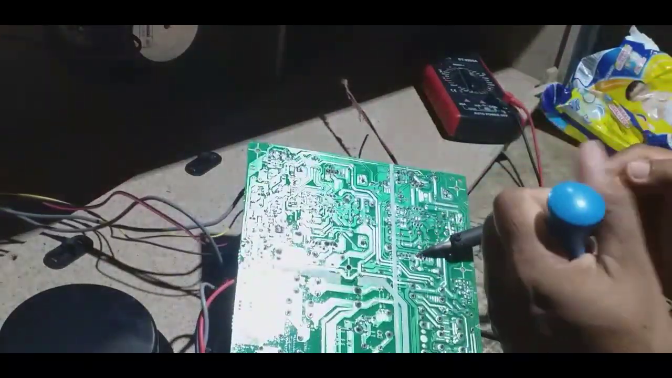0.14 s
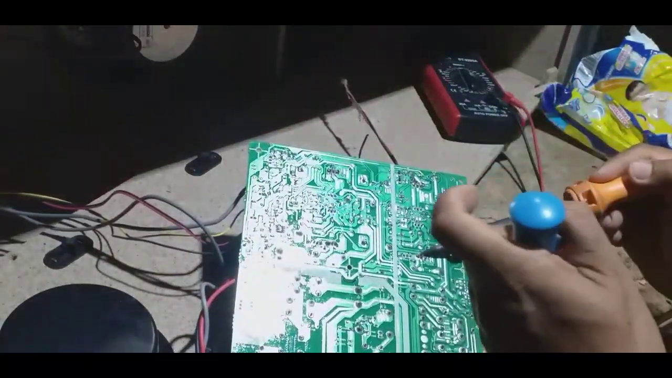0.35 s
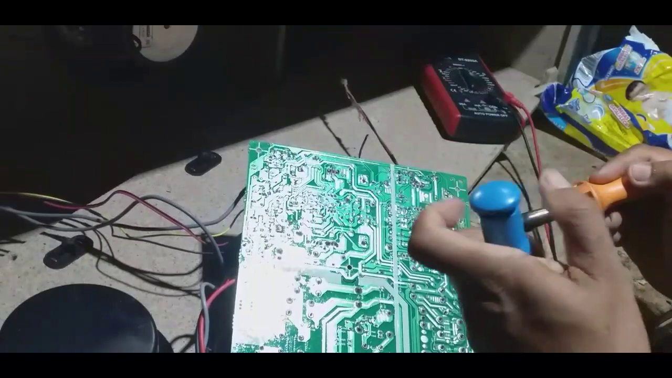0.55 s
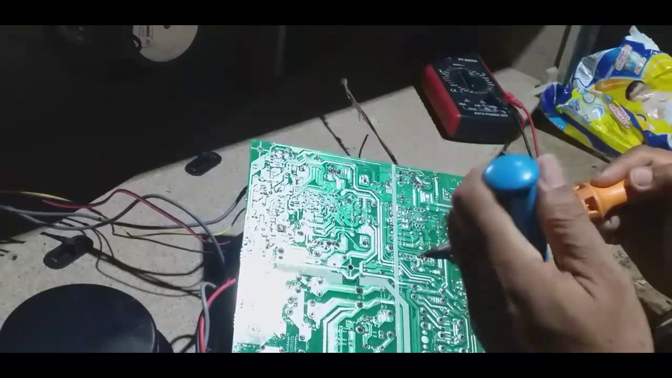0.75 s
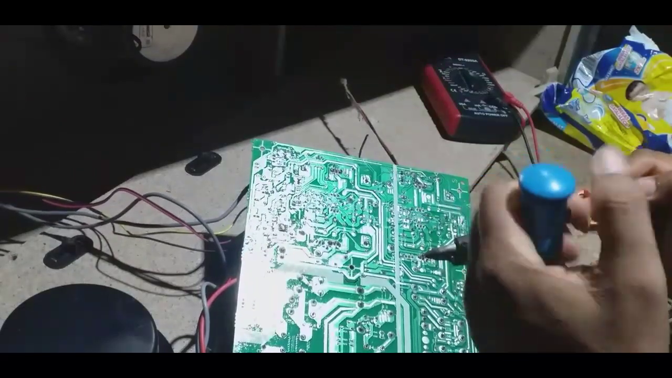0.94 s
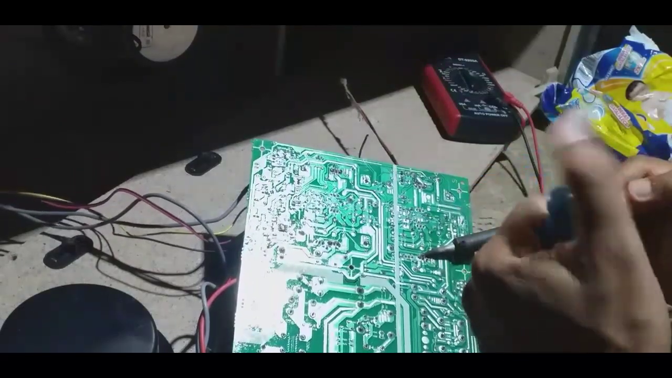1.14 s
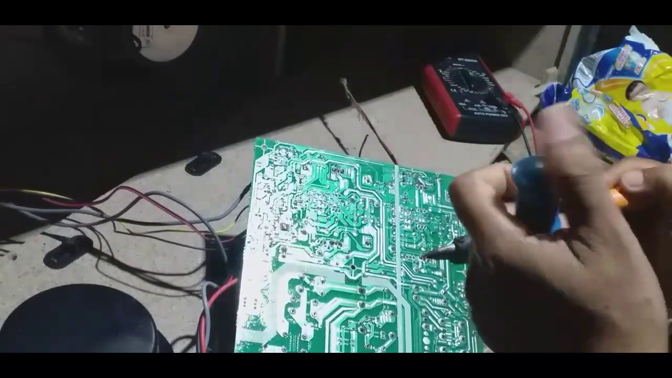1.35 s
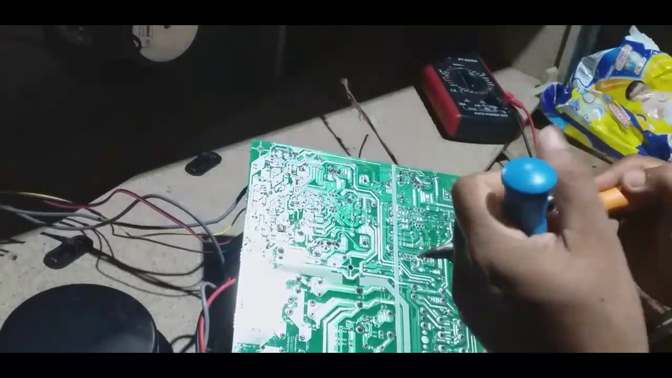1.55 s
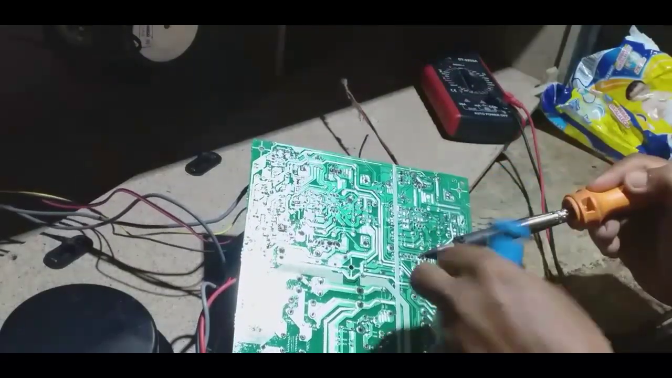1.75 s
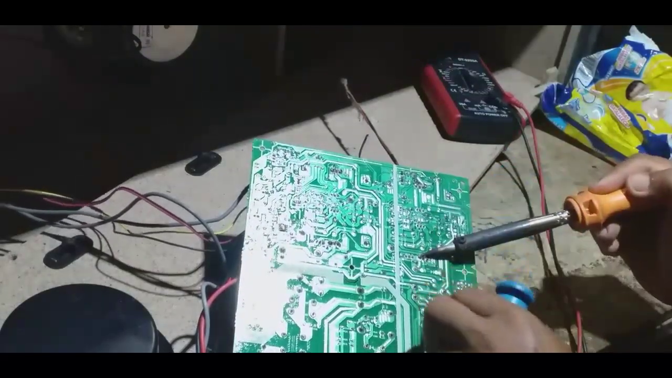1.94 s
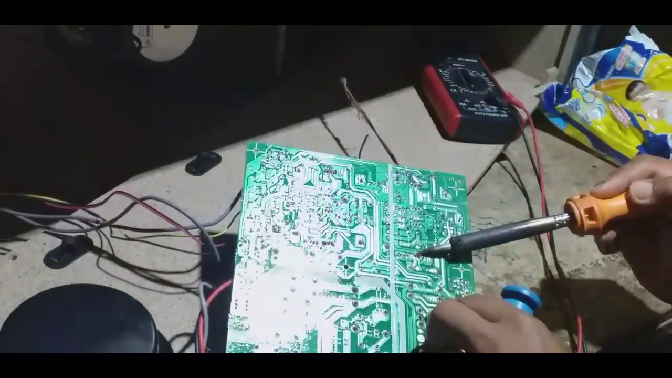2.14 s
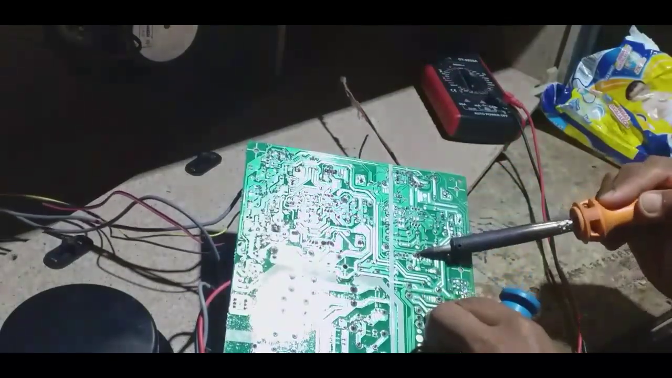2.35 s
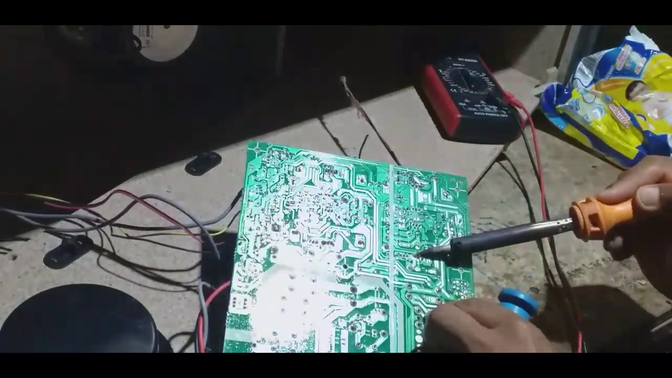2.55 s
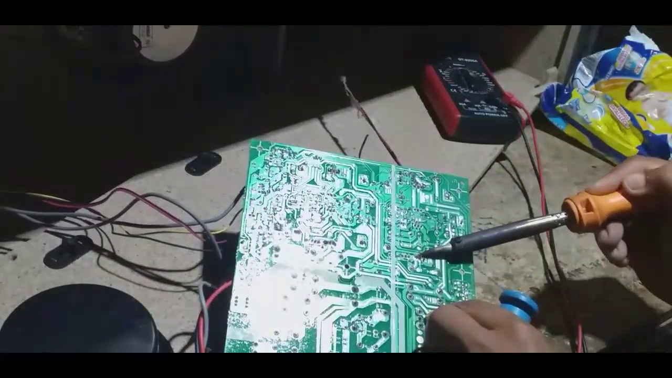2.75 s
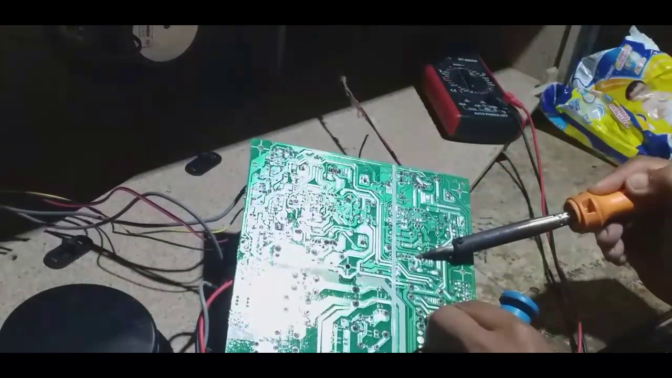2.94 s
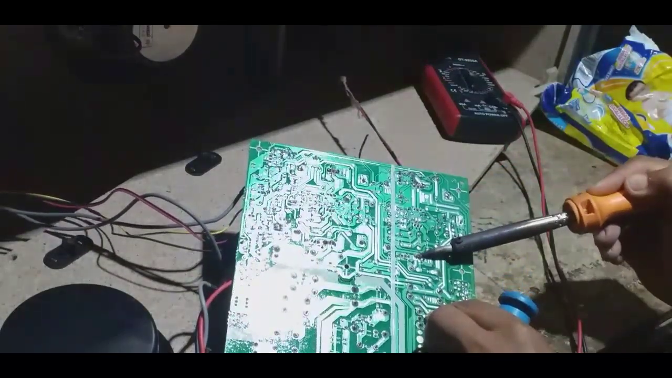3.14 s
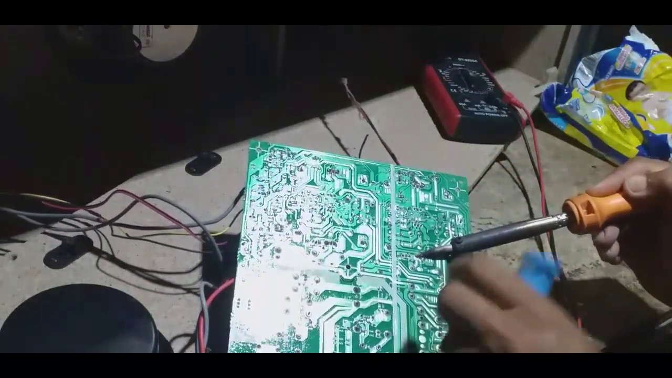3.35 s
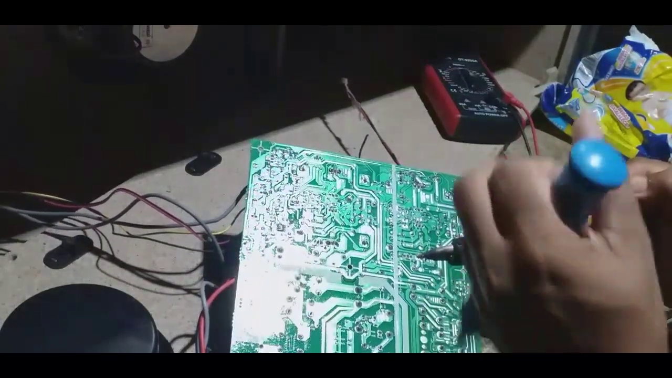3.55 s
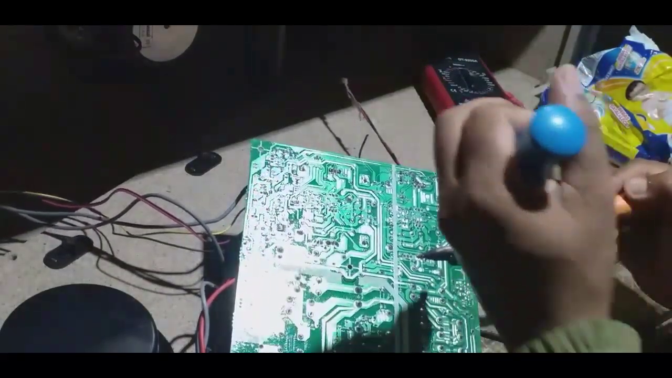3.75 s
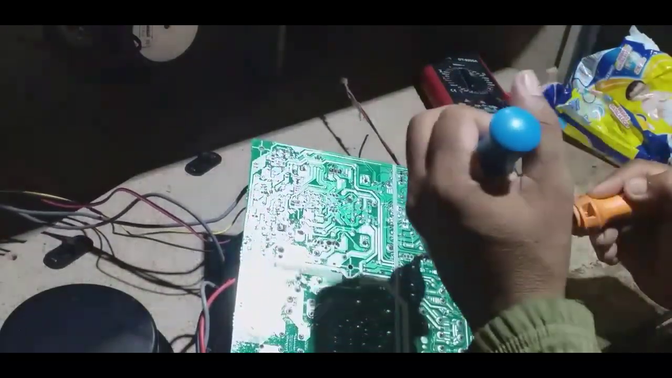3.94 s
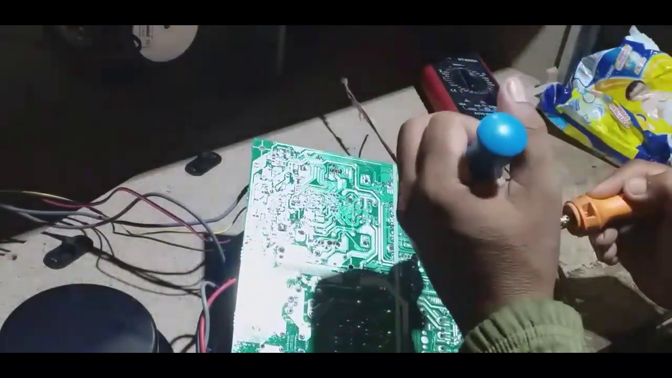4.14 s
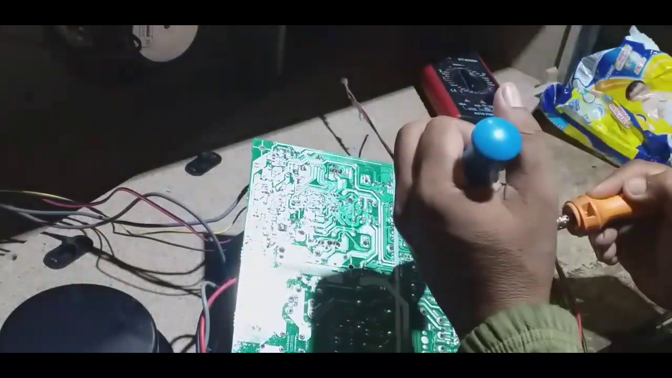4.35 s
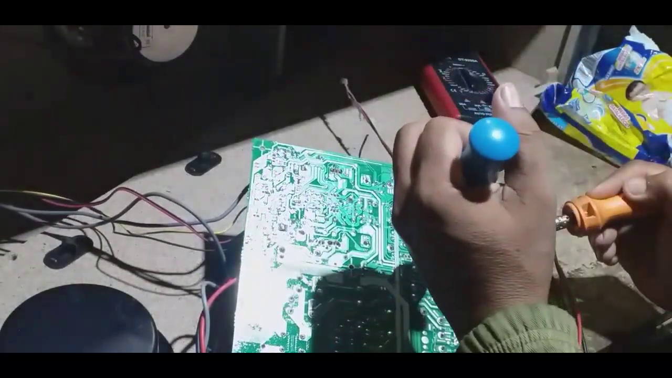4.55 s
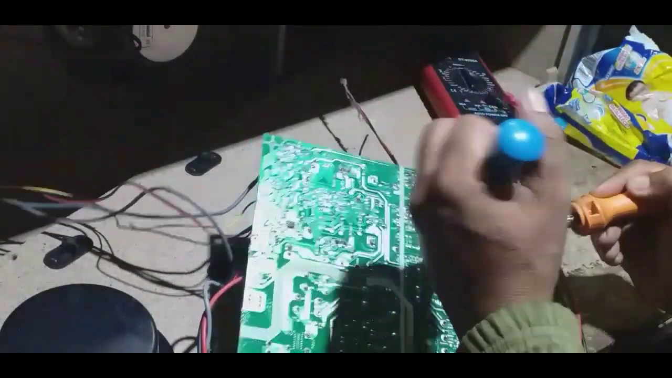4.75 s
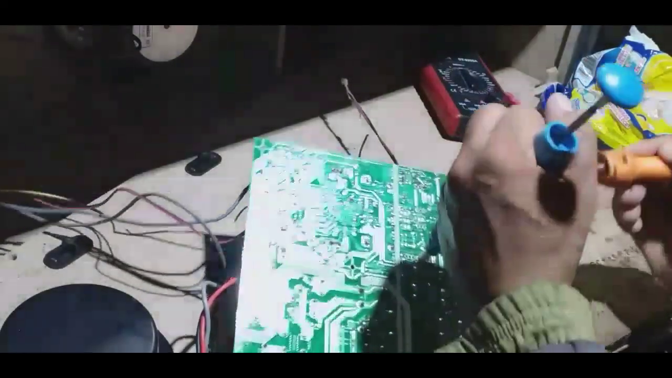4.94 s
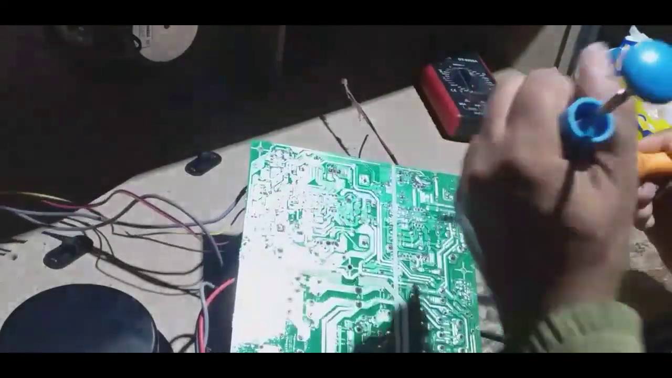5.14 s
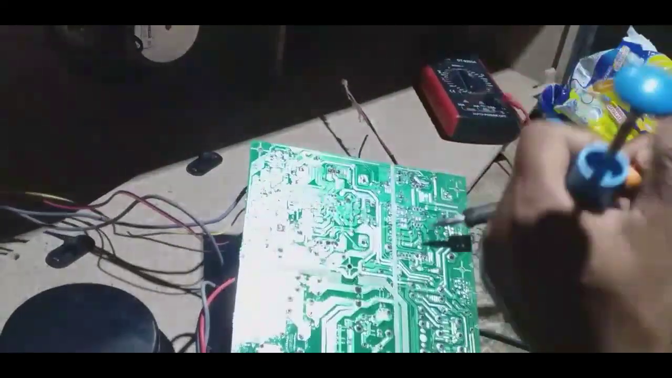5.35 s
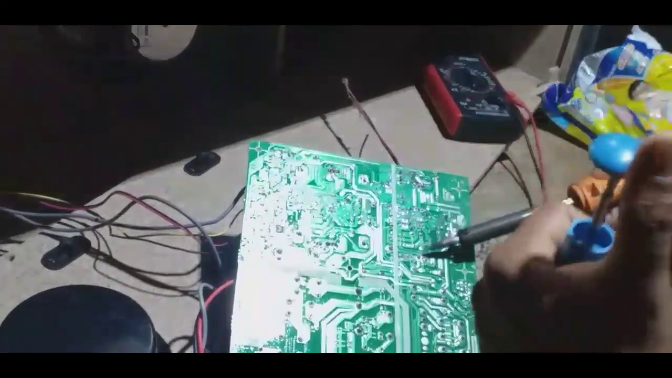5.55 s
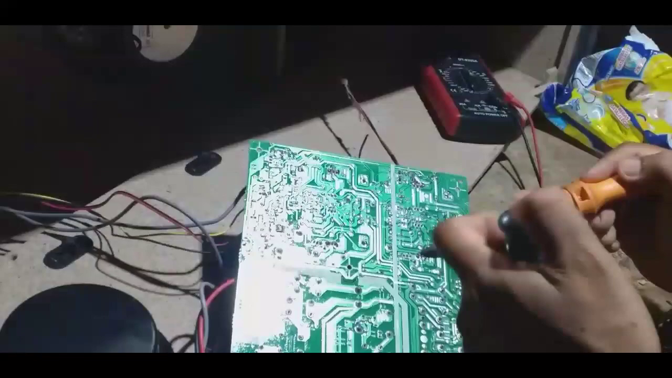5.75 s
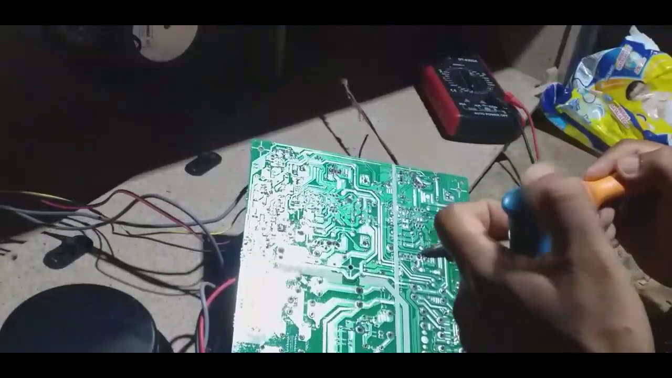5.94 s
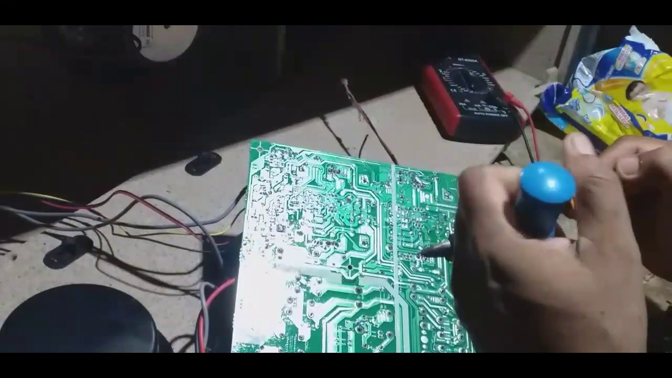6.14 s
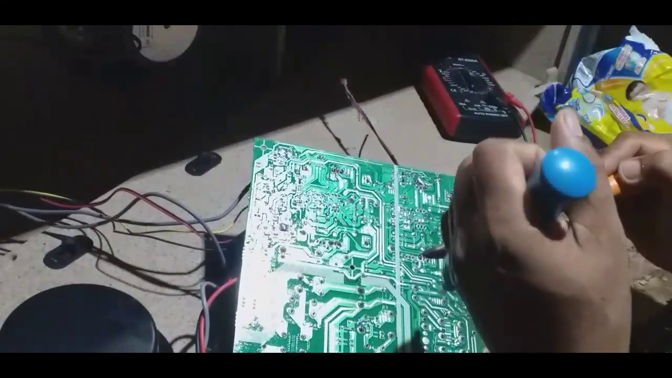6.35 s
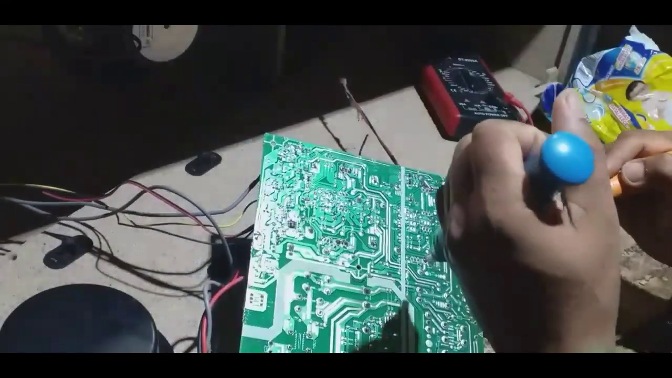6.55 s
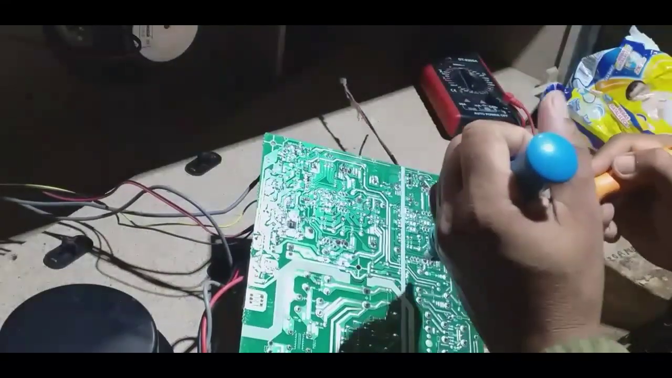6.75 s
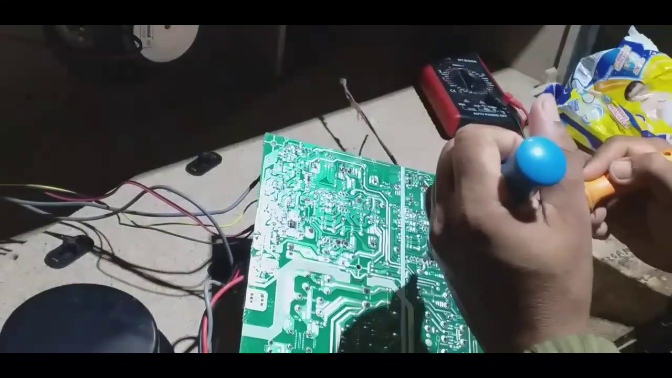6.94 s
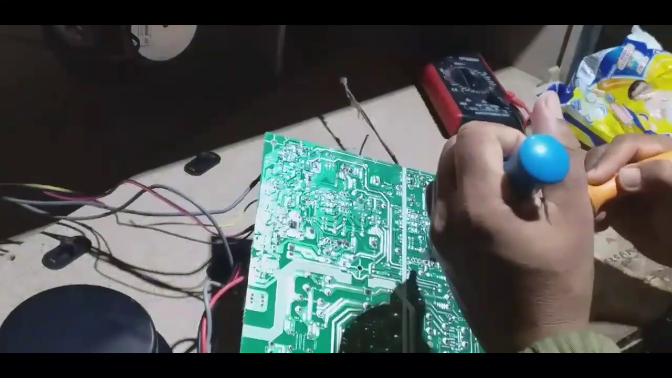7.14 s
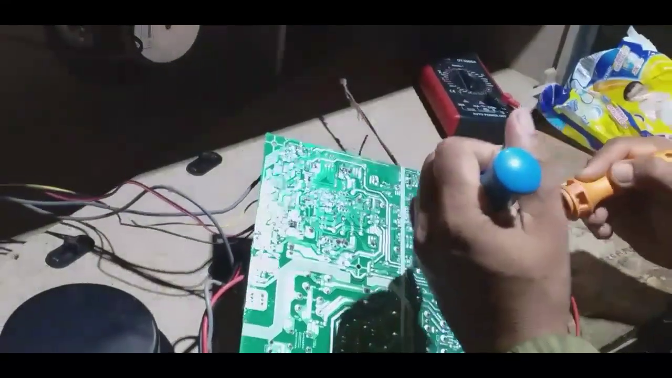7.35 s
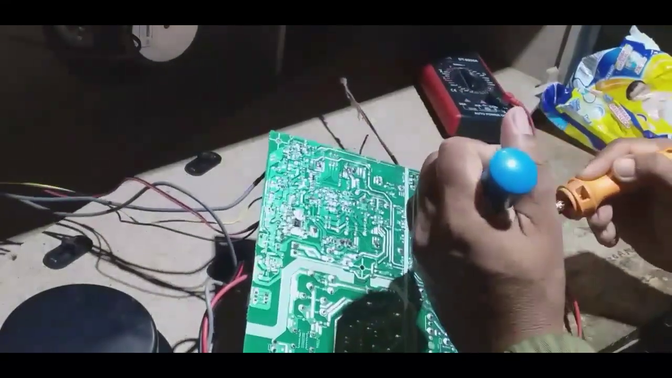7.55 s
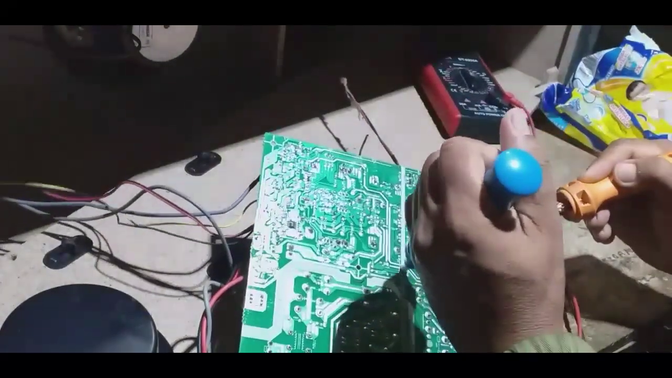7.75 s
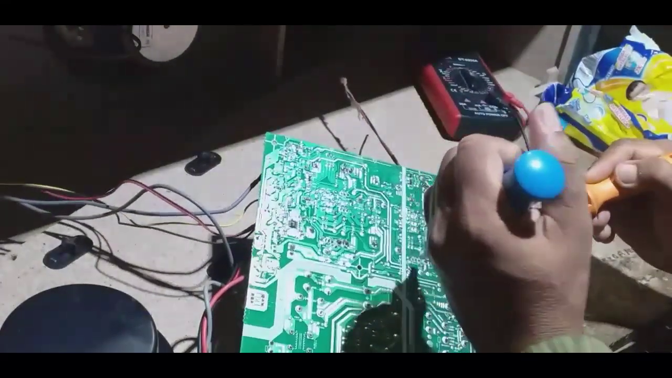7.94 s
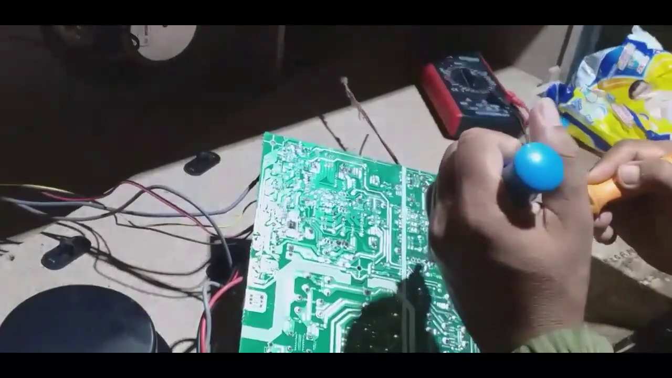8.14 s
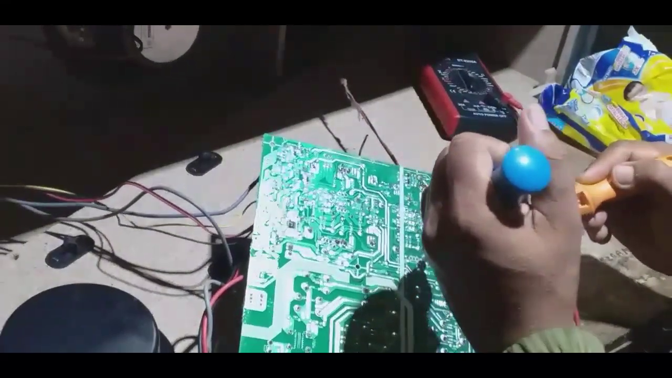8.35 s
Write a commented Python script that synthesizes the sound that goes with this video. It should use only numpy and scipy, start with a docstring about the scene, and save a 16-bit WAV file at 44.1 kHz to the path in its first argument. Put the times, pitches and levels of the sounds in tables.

```python
"""At a hard-walled workbench at night, a spring-loaded plastic desoldering pump is handled, cocked twice and fired once.
Latch clicks are noise bursts ringing the barrel, the piston rasps as gritty noise, knocks ring modes of board and bench.
Seal and spring give short narrow notes, and a diffuse tail follows every near sound. Outside, banded noise makes insect
choruses; rumble, a low hum and a distant engine that drones for a while lie below. A phone's gain sinks after loud treble."""
import sys
import numpy as np
from scipy import signal
from scipy.fft import rfft, irfft
from scipy.io import wavfile
from scipy.ndimage import uniform_filter1d

SR = 44100
rng = np.random.default_rng(int(sys.argv[2]) if len(sys.argv) > 2 else 0)


def wrap_up_sound(samples):
    """Save the sound to the file named by the first command line argument, as 16-bit audio."""
    columns = np.atleast_2d(samples).T
    # keep every value between -1 and 1, then stretch to whole-number steps
    tamed = np.clip(columns, -1, 1)
    steps = np.round(tamed * 32767).astype(np.int16)
    wavfile.write(sys.argv[1], SR, steps)


N = 369558
T = np.arange(N) / SR


def undb(db):
    """Decibels to amplitude."""
    return 10 ** (np.asarray(db) / 20)


def unit(x):
    """Scale to rms 1."""
    return x / np.sqrt(np.mean(x ** 2))


def fade_60db(t, t60_s):
    """Exponential decay that falls 60 dB in t60_s."""
    return np.exp(-np.log(1000) * t / t60_s)


def read(table):
    """Columns of a curve table, interpolated at every sample."""
    s, *columns = np.transpose(table)
    return [np.interp(T, s, column) for column in columns]


def band(x, lo_hz, hi_hz, order=2):
    """Butterworth band-pass."""
    return signal.sosfilt(signal.butter(order, [lo_hz, hi_hz], "bandpass", fs=SR, output="sos"), x)


def noise(lo_hz, hi_hz, order=2):
    """Band of noise, rms 1."""
    return unit(band(rng.standard_normal(N), lo_hz, hi_hz, order=order))


def coloured(points, size):
    """Noise with a spectrum of (Hz, dB) points joined over log frequency, rms 1."""
    hz, db = np.transpose(points)
    f = np.maximum(np.fft.rfftfreq(size, 1 / SR), 1)
    spectrum_db = np.interp(np.log(f), np.log(hz), db, -80, db[-1])
    return unit(irfft(rfft(rng.standard_normal(size)) * undb(spectrum_db), size))


def walk(rate):
    """Random levels held 1 / rate s and slewed twice; spread near 1."""
    k = int(SR / rate)
    steps = np.repeat(rng.standard_normal(N // k + 1), k)
    return 1.32 * uniform_filter1d(uniform_filter1d(steps, k), k)[:N]


def narrow(hz, width_hz):
    """Noise in a narrow band around a fixed or moving centre, rms 1: a crowd of near-equal tones."""
    pole = np.exp(-np.pi * width_hz / SR)
    z = rng.standard_normal(N) + 1j * rng.standard_normal(N)
    z = signal.lfilter([1], [1, -2 * pole, pole ** 2], z)
    return unit((z * np.exp(2j * np.pi * np.cumsum(hz + 0 * T) / SR)).real)


def arch(start, length):
    """A smooth rise and fall over one phrase."""
    return np.sin(np.pi * np.clip((T - start) / length, 0, 1))


def glide(table):
    """Pitch through a table of phrases: first to last Hz over the middle half of each."""
    rows = np.array(table)
    start, length = rows[:, 0], rows[:, 1]
    times = np.maximum.accumulate(np.c_[start + length / 4, start + length * 3 / 4].ravel())
    return np.interp(T, times, rows[:, 2:4].ravel())


def add(out, x, s):
    """Mix x into out from time s."""
    i = int(s * SR)
    out[i:i + len(x)] += x[:N - i]


def microphone_hiss():
    """Steady microphone noise, its spectrum heaviest in the top octave."""
    # hiss spectrum: pitch_hz, relative_level_db
    hiss_curve = [(5000, -51.5), (8500, -24.5), (9380, 0.5), (14900, 6.5), (15800, -5)]
    return undb(-80.5) * coloured(hiss_curve, N)


def drone():
    """The engine's steady line: a wavering sine slides up to pitch, holds and stops."""
    start_s, rise_s, stop_s, fall_s = 3.0, .17, 5.74, 0.23
    start_hz, held_hz, level_db = 90, 99.5, -47
    up = np.clip((T - start_s) / rise_s, 0, 1)
    hz = start_hz + (held_hz - start_hz) * up + 0.42 * walk(4)
    db = level_db + 1.5 * walk(12)
    gate = up ** 2 * np.clip(1 - (T - stop_s) / fall_s, 0, 1) ** 2
    return gate * undb(db) * np.sqrt(2) * np.sin(2 * np.pi * np.cumsum(hz) / SR)


def traffic():
    """Noise rumble in three swaying bands over a steady low band, an engine's two lines and a low hum."""
    # distant traffic: time_s, rumble_db, upper_rumble_db, roar_db
    traffic_curve = [(0, -61.5, -66, -68), (.45, -66, -72, -70), (.7, -65.5, -77.5, -77),
                     (1.55, -67.5, -71.5, -77), (2.03, -61, -76, -75.5), (2.66, -66.5, -83, -79),
                     (2.85, -55.5, -68, -81), (3.0, -53.5, -55.5, -81), (3.4, -56, -62, -72),
                     (3.751, -55, -67, -79), (4.301, -55.5, -65.5, -70), (4.85, -58.5, -60, -69),
                     (5.201, -59, -64, -66), (5.5, -58, -68.5, -76), (6.05, -64.5, -70, -75),
                     (6.498, -61.5, -78.5, -77), (6.78, -58.5, -67.5, -75), (7.2, -57.5, -73.5, -79.5),
                     (7.7, -58.5, -64.5, -77), (8.38, -53.5, -63, -89)]
    # the engine's rougher upper line: time_s, level_db
    upper_curve = [(0, -63), (.62, -65), (.78, -56), (1.05, -68), (1.25, -57.5), (1.65, -66.5),
                   (2.7, -64.5), (3.08, -42.5), (3.3, -58.5), (4.1, -53), (5.25, -49.5), (6.2, -65.5),
                   (6.9, -65), (7.5, -52), (7.8, -62.5), (8.38, -57)]
    # low hum: time_s, level_db
    hum_curve = [(0, -62), (2.0, -57), (2.4, -68.5), (3.3, -59), (4.1, -65), (4.85, -54), (5.6, -68.5),
                 (7.2, -61.5), (7.65, -70.5), (8.38, -56.5)]
    out = undb(-64.5) * noise(48, 130, order=4)
    for db, (lo, hi) in zip(read(traffic_curve), [(105, 237.3), (240, 450), (600, 6200)]):
        out = out + undb(db + 2.2 * walk(10)) * noise(lo, hi)
    upper = undb(read(upper_curve)[0]) * narrow(136.1, 26.4)
    hum = undb(read(hum_curve)[0]) * narrow(67.5, 6.)
    return out + drone() + upper + hum


def night_chorus():
    """Many insects at once blur into two swaying noise bands that hold all night."""
    # steady chorus: time_s, main_level_db, top_band_level_db
    night_curve = [(0, -64, -68), (1.0, -62.5, -69.5), (1.6, -65, -70), (2.05, -61.5, -69),
                   (2.8, -63.5, -71.5), (3.75, -63.5, -69.5), (4.3, -63.5, -70.5), (4.85, -62, -66.5),
                   (5.4, -65, -71), (6.1, -65, -72), (6.75, -61, -71), (7.1, -61.5, -68),
                   (7.5, -63.5, -74.5), (8.0, -65.5, -70), (8.38, -63, -73)]
    main_db, top_db = read(night_curve)
    main = unit(noise(4270, 4756) + noise(4350, 5670, order=3))
    top = unit(noise(5910, 6470) + 0.98 * noise(6900, 7680) + 0.13 * noise(4400, 7800))
    return undb(main_db + 1.2 * walk(12)) * main + undb(top_db + .8 * walk(6.5)) * top


def swelling_chorus():
    """Chorus near 3.8 kHz: gliding narrow noise swells over a faint bed, each swell thin or broad."""
    # swells: start_s, length_s, first_hz, last_hz, width_share (0 thin to 1 broad), level_db
    swells = [(-.1, .3, 3660, 3800, 1, -69), (.24, .46, 3570, 3750, 0.4, -68.5),
              (.85, 0.67, 3910, 4000, .8, -77), (2.17, .2, 3415, 3500, 0.7, -77),
              (2.33, 0.21, 4380, 4210, .2, -60.5), (2.4, 0.42, 3950, 3820, 0.17, -62.5),
              (3.2, 0.84, 4040, 3950, 0.99, -73), (4.05, 0.44, 4000, 4000, .7, -68),
              (4.3, 0.68, 3920, 3920, 0.66, -63), (5.45, .4, 3810, 3800, .8, -75),
              (6.5, .5, 3890, 3850, 0.51, -75), (7.35, 0.39, 4000, 3850, 0.53, -74.5),
              (7.88, 0.22, 3430, 3500, .9, -67), (8.06, 0.41, 4120, 3850, 0.4, -64)]
    centre_hz = glide(swells)
    thin, broad = narrow(centre_hz, 250.), narrow(centre_hz - 150, 670.0)
    out = undb(-88.5) * broad
    for s, length, _, _, wide, db in swells:
        mix = np.sqrt(1 - wide) * thin + np.sqrt(wide) * broad
        out = out + undb(db) * arch(s, length) * mix
    return out


def low_chorus():
    """Low chorus: fluttering phrases of narrow noise with a wider skirt, gliding in pitch."""
    # phrases: start_s, length_s, first_hz, last_hz, level_db
    low_phrases = [(.03, 0.16, 2600, 2550, -69.5), (.22, .14, 2530, 2530, -66),
                   (.42, 0.14, 2490, 2500, -64.5), (.58, 0.48, 2640, 2580, -68),
                   (1.0, .11, 2490, 2440, -62.5), (1.1, 0.32, 2540, 2650, -66.5),
                   (1.38, .6, 2850, 2730, -74.5), (1.8, 0.84, 2693, 2630, -75.5),
                   (2.5, 0.46, 2720, 2820, -70.5), (4.36, .6, 2750, 2740, -65.5),
                   (5.0, 0.84, 2700, 2640, -75), (7.4, 0.57, 2850, 2736, -70.5),
                   (7.82, 0.42, 2710, 2666, -70.5), (8.15, 0.61, 2740, 2780, -63)]
    hz = glide(low_phrases)
    level = sum(undb(db) * arch(s, length) for s, length, _, _, db in low_phrases)
    return level * undb(1.3 * walk(30)) * unit(narrow(hz, 130.0) + 0.36 * narrow(hz, 700.))


def cricket():
    """One cricket near 5.3 kHz sings bouts of even throbs, about four a second, of banded noise."""
    # bouts: first_throb_s, last_throb_s, level_db
    bouts = [(0.268, .76, -62), (0.992, 1.48, -58), (1.73, 1.73, -62.5), (6.152, 7.39, -63)]
    period_s, throb_s = 0.251, 0.075
    level = np.zeros(N)
    for first, last, db in bouts:
        for s in np.arange(first, last + period_s / 2, period_s):
            level += undb(db) * np.exp(-((T - s) / throb_s) ** 2)
    return level * unit(noise(5300, 5570) + noise(5000, 5130))


def knocks():
    """A soft push rings sine modes of board and bench and shakes loose parts as fading noise bands."""
    # knocks into board and bench: start_s, level_db, deep_share_db, bright_share_db, ring_scale
    knock_table = [(0.088, -51, -10, -4, 3), (1.172, -52, 11, 3, 0.6), (1.184, -43.5, -2, -7, 2.4),
                   (1.293, -42.5, -26, -11, 1.2), (1.366, -26.5, -21, -14.5, 0.61),
                   (2.022, -46.5, 5, -7, 0.71), (4.185, -32, -36, -1, 0.37), (4.199, -45.5, -7, 0, 1.6),
                   (4.881, -34, -5.5, -4.5, 2.7), (4.907, -17.5, -7.5, -13.5, 1.5),
                   (4.923, -24.5, 4, -2.5, 1.1), (5.717, -47.5, 3, -3.5, 0.98),
                   (5.798, -39, -12, -13, 1.44), (5.929, -36.5, -13, -18.5, 0.69),
                   (7.434, -33, -5, -24, 1.23), (7.469, -49.5, 9.5, -18, 0.97)]
    # modes of board and bench: pitch_hz, level_db, ring_s (60 dB fade at ring scale 1)
    bench_modes = [(186.7, 1.5, 0.096), (277.7, -1.5, 0.11), (534, 0, 0.041), (688, 2, 0.053),
                   (934, -10.5, 0.068), (1500, -25, 0.013)]
    out, t = np.zeros(N), np.arange(16384) / SR
    for s, db, deep_db, bright_db, scale in knock_table:
        ring, shake = 0, rng.standard_normal(len(t))
        loose_parts = [(130, 273, deep_db - 12.5, 0.3), (347.8, 680, -9, 0.096),
                       (610, 990, bright_db - 10.0, 0.19)]
        for lo, hi, share_db, t60 in loose_parts:
            ring = ring + undb(share_db) * unit(band(shake, lo, hi)) * fade_60db(t, t60 * scale)
        for hz, mode_db, t60 in bench_modes:
            detune, phase = rng.standard_normal(2)
            share_db = deep_db if hz < 400 else bright_db if hz > 600 else 0
            mode = np.sin(2 * np.pi * hz * (1 + .012 * detune) * t + phase)
            ring = ring + undb(mode_db + share_db) * mode * fade_60db(t, t60 * scale)
        add(out, undb(db) * ring * (1 - np.exp(-t / 0.002)), s)  # soft onset
    return out


def barrel(x):
    """The plastic tube's broad resonances; it radiates little outside them."""
    # resonances of the tube: pitch_hz, width_hz, level_db
    tube_modes = [(2280, 220, 9), (3310, 170, 0.5), (3670, 490, 8.5), (5040, 2200, 4.5), (5830, 790, 6.5),
                  (7300, 650, 2), (8200, 700, -47)]
    ring = sum(undb(db) * signal.lfilter(*signal.iirpeak(hz, hz / width, SR), x)
               for hz, width, db in tube_modes)
    return band(ring, 2570, 8100, order=4)


def clicks():
    """Each click is a crack with a burst of rattle in the barrel; where it strikes tilts the colour."""
    # clicks on the pump: start_s, body_peak_db, centre_hz, treble_db and low_edge_db (re body),
    # ring_ms (60 dB fade)
    click_table = [(0.0885, -51, 5710, -25, -20, 13), (0.1385, -52, 7400, -8, -25, 14),
                   (0.3, -45, 3920, -31, -11, 15), (0.333, -32.5, 3850, -42, -13, 32),
                   (0.543, -43, 4770, -26, -34, 15), (0.5775, -41, 4030, -29, -36, 45),
                   (0.735, -40.5, 4740, -22, -30, 12), (0.758, -37.5, 5470, -22, -28, 19),
                   (0.9044, -53.5, 6700, -27, -36, 42), (1.169, -38.5, 5600, -37, -22, 25),
                   (1.2466, -32, 6070, -35, -30, 17), (1.255, -30.5, 6800, -35, -27, 14),
                   (1.259, -34, 3520, -30, -20, 20), (1.2652, -29.5, 3400, -30, -36, 10),
                   (1.2676, -12, 4900, -22, -25, 17), (1.3639, -35.5, 3500, -28, -12, 16),
                   (1.367, -20, 5600, -17, -34, 14), (1.9703, -45, 5800, -32, -18, 31),
                   (2.5272, -45, 5000, -16, -55, 19), (3.31, -46.5, 5630, -31, -11, 23),
                   (4.183, -36, 4160, -39, -13.5, 21), (4.8494, -39, 6010, -28, -27, 23),
                   (4.8817, -10, 3730, -25, -27, 14), (4.8863, -4, 4400, -20, -28, 10),
                   (4.8982, -4, 4300, -20, -18, 14), (4.9097, -18, 3210, -18.5, -27, 21),
                   (5.3812, -19, 7200, -16, -28, 16), (5.4101, -51, 7130, -10.5, -30.5, 11),
                   (5.7192, -27.5, 6100, -30.5, -24.5, 12), (5.761, -23, 5820, -25, -27, 13),
                   (5.7806, -12.5, 3300, -16, -8, 22), (5.9275, -27.5, 3450, -19, -36.5, 16),
                   (6.2256, -48.5, 4700, -36, -25, 26), (7.1246, -50, 5120, -22, -31, 14),
                   (7.4315, -33, 3950, -43, -5, 31), (7.674, -54, 4000, -31, -1, 16)]
    out, t = np.zeros(N), np.arange(4096) / SR
    for s, db, hz, treble_db, low_db, ring_ms in click_table:
        crack = 0.33 * np.exp(-t / 0.00016)
        burst = np.sign(rng.standard_normal(len(t))) * (fade_60db(t, ring_ms / 1000) + crack)
        body = .5 * barrel(burst) + 2.7 * band(burst, hz / 1.205, hz * 1.166)
        top = band(burst, 9000, 16500, order=3)
        low = band(burst, 1700, 2600, order=3)
        colour = unit(body) + undb(treble_db) * unit(top) + undb(low_db) * unit(low)
        body_gain = undb(db) / abs(body).max()
        add(out, body_gain * np.std(body) * colour, s)
    return out


def squeaks():
    """Piston seal and steel spring give short narrow noise notes, quick to start and softer to end."""
    # squeaks of the seal and rings of the spring: start_s, length_s, pitch_hz, width_hz, level_db
    squeak_table = [(5.672, .04, 7300, 300, -47), (5.7, .065, 1610, 80, -54), (4.905, .1, 10800, 150, -53),
                    (.139, .09, 14300, 2200, -70), (3.23, .1, 2000, 350, -66)]
    out, t = np.zeros(N), np.arange(8192) / SR
    for s, length, hz, width_hz, db in squeak_table:
        shape = np.interp(t / length, [0, .15, .7, 1], [0, 0.65, 0.46, 0.0])
        note = band(rng.standard_normal(len(t)), hz - width_hz / 2, hz + width_hz / 2)
        add(out, undb(db) * shape * unit(note), s)
    return out


def slides():
    """Stick-slip grit: noise in uneven grains through the barrel, with a hollow note of the air in the tube."""
    # strokes of piston and fingers along the barrel, and the spring rattling out after the shot:
    # start_s, rise_s, hold_s, fade_db_per_s, level_db, low_edge_db and treble_db (re body)
    strokes = [(1.162, 0.0044, 0.045, 398, -65, -6, -24), (1.265, .03, 0.028, 900, -52.5, -13, -0.5),
               (1.331, 0.034, 0.0034, 1200, -36, -39, -16), (1.385, 0.0074, .03, 400, -60, -7, -5),
               (3.233, .06, 0.022, 152, -75.5, 7, -20), (3.4, 0.068, 0.069, 120, -75.5, 2, -20),
               (4.18, .003, 0.0064, 107, -61, 3, -30), (4.882, 0.0069, .01, 900, -21, -11.5, -9.5),
               (4.897, .01, 0.045, 171, -31, -12.5, -10.5), (5.381, 0.028, .01, 248.5, -63, -25, -0.5),
               (5.663, .004, 0.06, 201, -49, -22, -19), (5.727, 0.022, 0.03, 500, -55, -1, -8.5),
               (5.798, 0.012, 0.023, 350, -51, 1, -8.5), (5.88, 0.039, .005, 249.5, -54, -7, -10.5),
               (7.43, .003, 0.0034, 150, -64, -3, -16)]
    grit = rng.standard_normal(N) * undb(2.5 * walk(300) + .6 * walk(60))
    body = unit(barrel(grit))
    hollow = unit(band(grit, 1400, 2900))
    top = unit(band(grit, 9500, 16500))
    out = np.zeros(N)
    for s, rise, hold, fade, db, low_db, treble_db in strokes:
        at = slice(int(s * SR), int(s * SR) + SR // 2)
        t = T[at] - s
        rise_db = -36 * np.clip(1 - t / rise, 0, 1)
        fade_db = -fade * np.maximum(t - rise - hold, 0)
        colour = body[at] + undb(low_db) * hollow[at] + undb(treble_db) * top[at]
        out[at] += undb(db + rise_db + fade_db) * colour
    return out


def room(x):
    """Hard walls return a diffuse, fading tail: convolution with coloured, decaying noise."""
    # colour of the tail: pitch_hz, relative_level_db
    wall_colour = [(200, -12.5), (600, 3), (1500, -2), (3500, -0.5), (6500, -5), (9000, -8), (15000, -3)]
    t60_s, level_db, onset_s = 0.57, -13.5, 0.0012
    t = np.arange(SR) / SR
    tail = coloured(wall_colour, SR) * fade_60db(t, t60_s) * (1 - np.exp(-(t / onset_s) ** 2))
    tail = tail / np.sqrt(np.sum(tail ** 2))
    return signal.fftconvolve(x, undb(level_db) * tail)[:N]


def scene():
    """Pump and bench in the room, the night outside, the microphone's hiss."""
    outside = traffic() + night_chorus() + swelling_chorus() + low_chorus() + cricket()
    near = knocks() + clicks() + squeaks() + slides()
    return (microphone_hiss() + outside + near + room(near))[None]


def record(dry):
    """The phone's gain sinks after loud treble and creeps back; the top is cut."""
    threshold_db, power, smoothing_s, top_hz = -52.5, 0.074, 0.26, 15750
    pole = np.exp(-1 / (smoothing_s * SR))
    treble_power = band(dry, 1000, 14000) ** 2
    loud = signal.lfilter([(1 - pole) ** 2], [1, -2 * pole, pole ** 2], treble_power)
    gain = (1 + loud / undb(2 * threshold_db)) ** -power
    return signal.sosfilt(signal.ellip(10, .2, 60, top_hz, fs=SR, output="sos"), dry * gain)


dry = scene()
out = record(dry)
wrap_up_sound(out)
```